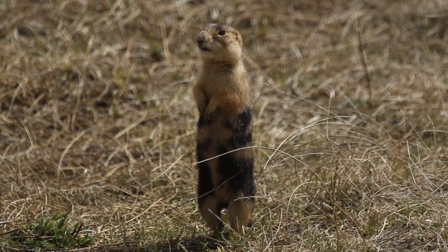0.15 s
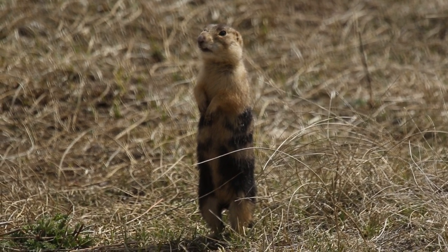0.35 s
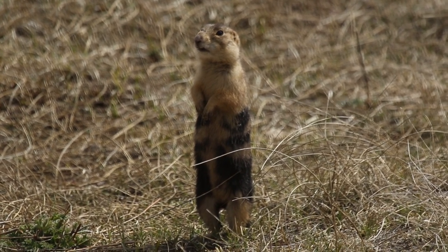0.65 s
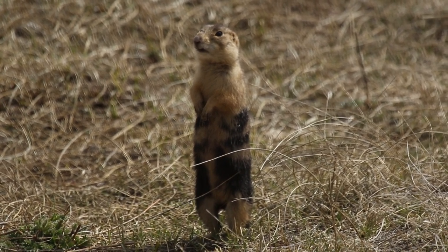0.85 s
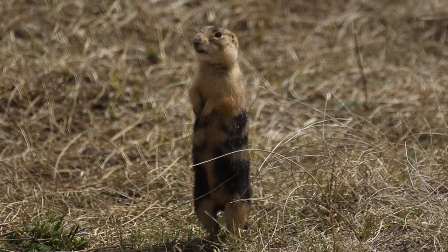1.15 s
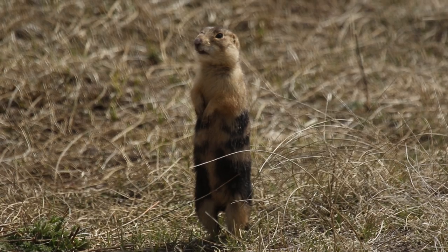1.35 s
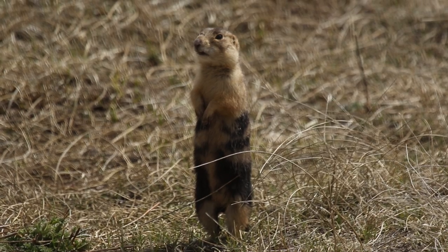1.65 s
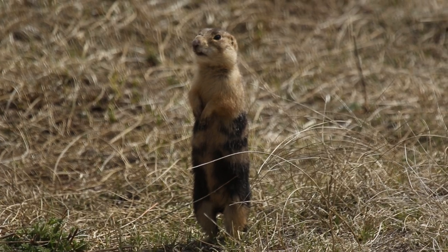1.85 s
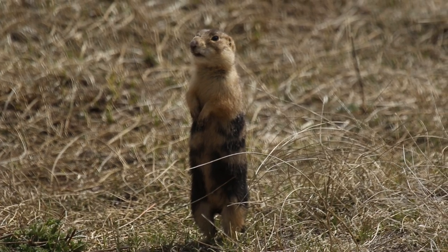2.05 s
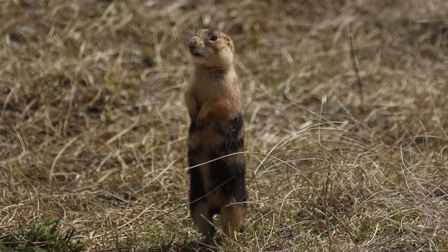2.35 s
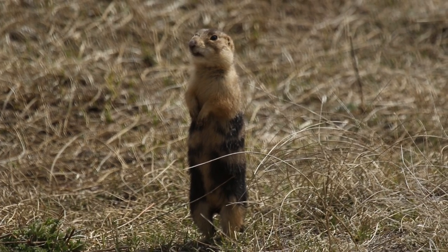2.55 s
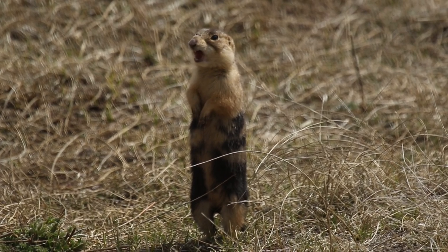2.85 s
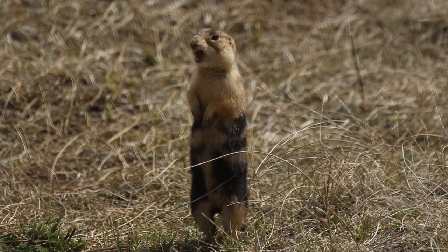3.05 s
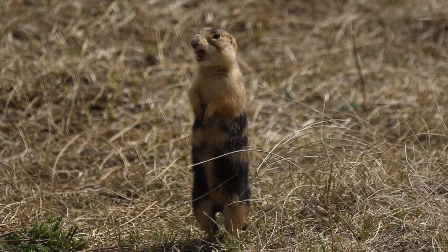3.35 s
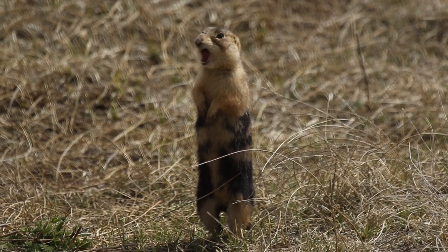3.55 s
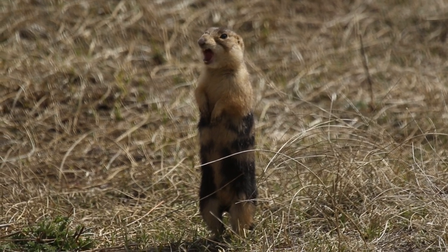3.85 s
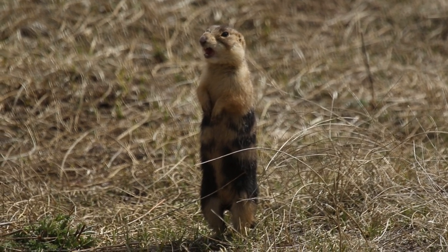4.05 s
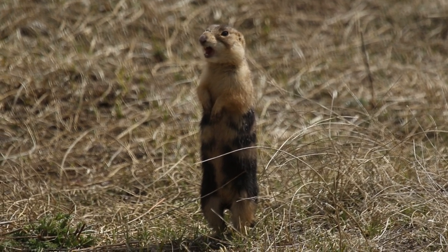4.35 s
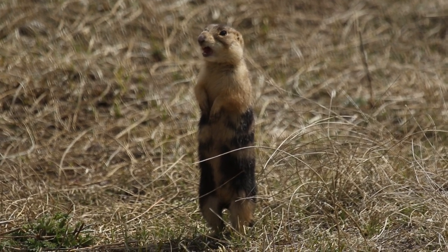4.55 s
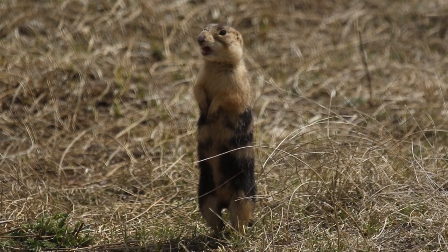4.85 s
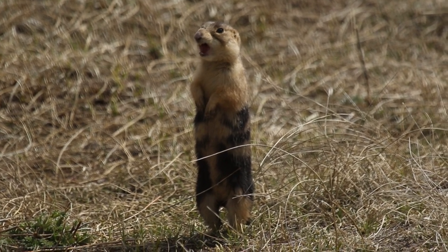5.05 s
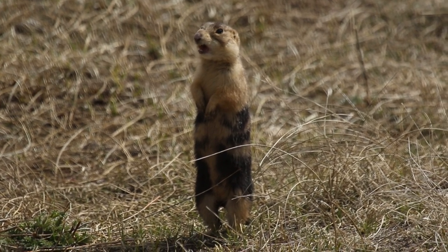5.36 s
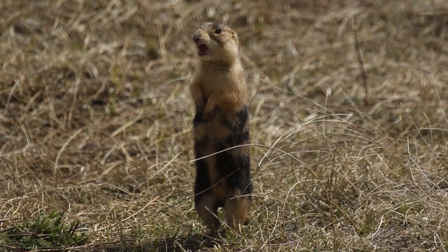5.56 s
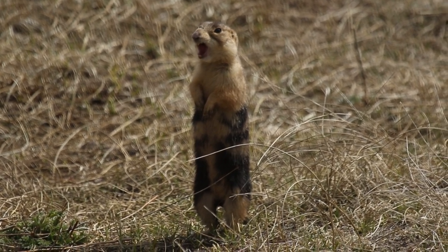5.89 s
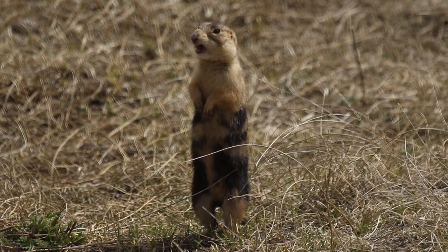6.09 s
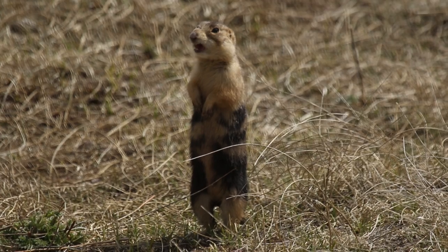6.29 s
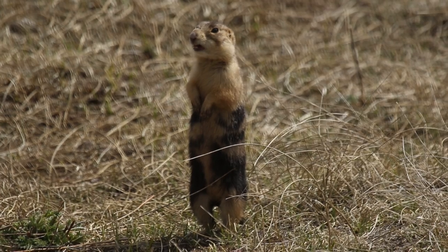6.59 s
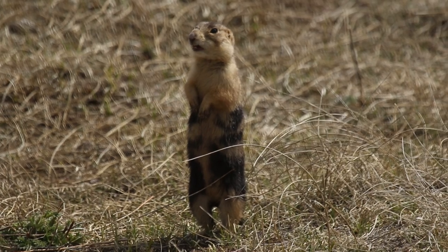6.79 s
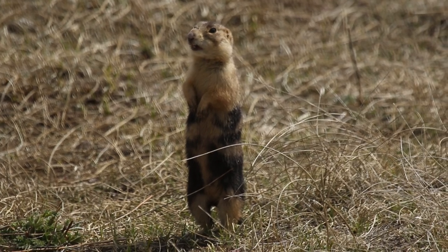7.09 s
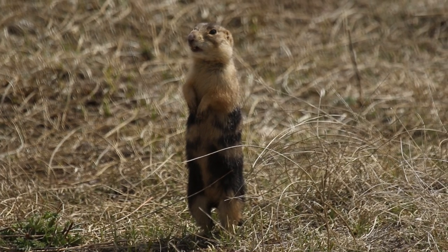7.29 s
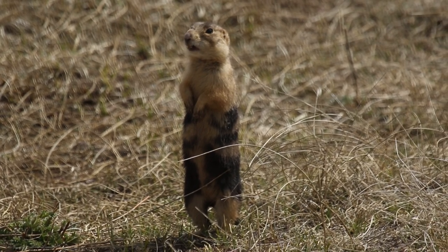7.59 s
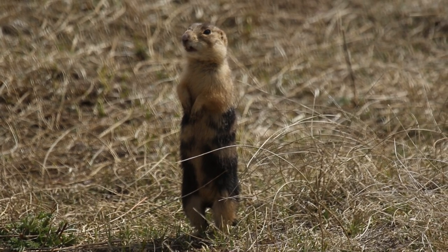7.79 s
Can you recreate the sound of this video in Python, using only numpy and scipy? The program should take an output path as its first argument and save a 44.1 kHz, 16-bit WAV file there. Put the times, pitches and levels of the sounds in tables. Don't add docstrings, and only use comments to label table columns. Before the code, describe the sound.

Heavy wind buffets an unprotected microphone; a small rodent huffs softly, then barks sharply at an even pace, with faint bird whistles afterwards.

```python
import sys
import numpy as np
from scipy import signal
from scipy.fft import rfft, irfft
from scipy.io import wavfile
from scipy.ndimage import uniform_filter1d

SR = 44100
rng = np.random.default_rng(int(sys.argv[2]) if len(sys.argv) > 2 else 0)


def volts(x):
    e = np.asarray(x, float) / 20
    return 10 ** e


def wrap_up_sound(samples):
    columns = np.atleast_2d(samples).T
    tamed = np.clip(columns, -1, 1)
    steps = np.round(tamed * 32767).astype(np.int16)
    wavfile.write(sys.argv[1], SR, steps)


N = 349747
T = np.arange(N) / SR

# (frequency [Hz], density [dB per Hz])
AIR_COLOUR = [(120, -38.5), (200, -1.5), (249, -18), (322, 1.5), (590, -8.5), (659, -4.5), (851, -12),
              (916, -12.5), (1710, -16), (2470, -14), (3070, -18.5), (5230, -23), (11100, -23.5),
              (15100, -29.5), (16000, -33)]
AIR_DB = -56

# (time [s], rumble level [dB])
STEADY_WIND = [(0, -29.5), (.19, -32), (.27, -47.5), (.52, -43.5), (.68, -28), (1.18, -25.5), (1.35, -41.5),
               (1.64, -46.5), (1.72, -33.5), (2.3, -29), (3.0, -35), (4.1, -26), (5.4, -25.5),
               (6.35, -31.5), (6.74, -39.5), (6.93, -64), (7.1, -36.5), (7.93, -36)]
# (time [s], drop [dB], length [s])
LULLS = [(0.633, 20, 0.033), (0.758, 6.5, .04), (1.234, 10, 0.027), (2.005, 15, 0.034),
         (2.308, 11.5, 0.055), (2.65, 16, 0.013), (2.866, 15, 0.071), (3.067, 18, 0.038), (3.35, 11, 0.075),
         (3.53, -1, 0.067), (3.874, 9.5, 0.063), (4.004, 5, 0.037), (4.857, 8, 0.05), (5.11, 4, 0.046),
         (5.5, 7.5, 0.039), (5.665, 9, 0.078), (5.987, 6, 0.052), (6.216, 4.5, 0.032), (6.46, 20, 0.098),
         (6.641, 19, 0.058), (7.362, 15.5, 0.047), (7.695, 14.5, 0.044)]
# (peak time [s], rumble level [dB], length [s], buffet re rumble [dB])
GUSTS = [(0.149, -21, 0.028, 0), (0.572, -26, 0.037, -2), (0.857, -19.5, 0.026, 4), (1.041, -27, 0.042, 2),
         (1.446, -25, 0.054, 0), (1.759, -18, 0.06, 2), (1.899, -29, 0.029, 1.5),
         (2.097, -23.5, 0.15, -8.5), (2.373, -18.5, 0.044, -1.4), (2.774, -22.5, 0.062, -8),
         (2.938, -26, 0.023, -16), (3.106, -25, 0.023, -7.5), (3.462, -20.5, 0.02, -3),
         (3.652, -27.5, 0.083, 1), (3.926, -30, 0.021, 3.5), (4.217, -23, 0.076, 2.5),
         (4.42, -17.5, 0.035, 10), (4.791, -21.5, 0.049, 2.5), (4.912, -25, 0.043, 8.5),
         (5.031, -16.5, 0.048, -1), (5.161, -30, 0.061, 10), (5.348, -16.5, 0.049, 1.3),
         (5.635, -20, 0.028, -10.5), (5.849, -15, 0.058, 0.6), (6.047, -25, 0.04, -14),
         (6.394, -19, 0.025, -19.5), (6.565, -23.5, 0.074, -3), (7.057, -29, 0.042, -8.1),
         (7.57, -37, 0.12, -2.5), (7.872, -26.1, 0.059, -4)]
SURGE_DB, SURGE_HZ = 2.5, 4.6
BUFFET_DB, BUFFET_GROWS = -6.5, 0.32
FLUTTER_DB, FLUTTER_GROWS = -12.5, 1.33
SWAY_DB, SWAY_FOLLOWS = -51.5, 0.6

# (time [s], peak level [dB], pitch [Hz])
THUMPS = [(0.147, -16, 98), (0.172, -16, 128), (0.567, -18, 92), (0.84, -13, 98), (1.019, -12.5, 96),
          (1.057, -14.5, 150), (1.141, -16.5, 112), (1.731, -20, 145), (1.758, -14.5, 112),
          (1.809, -8, 164), (1.895, -14, 129), (2.062, -14, 89), (2.105, -17, 139), (2.199, -12.5, 172),
          (3.409, -19, 89), (3.649, -18.5, 142), (3.922, -22, 132), (4.039, -17, 114), (4.169, -13.5, 148),
          (4.217, -12.5, 110), (4.466, -6.5, 183), (4.795, -15.5, 95.5), (4.885, -8, 210),
          (5.029, -9, 106.5), (5.143, -12.5, 137), (5.256, -18.5, 115), (5.82, -19, 90.5),
          (5.848, -13, 128), (5.902, -19, 102), (6.591, -21.5, 204)]
# (time [s], peak level [dB])
FLICKS = [(0.694, -30.5), (0.836, -27), (1.004, -34), (1.021, -15), (1.055, -15.5), (1.145, -27.5),
          (1.73, -19), (1.754, -27), (1.784, -24), (1.896, -23), (2.2, -21), (3.602, -27), (4.041, -25),
          (4.07, -25.5), (4.219, -26.5), (4.252, -23.5), (4.354, -17.5), (4.434, -18), (4.467, -18.5),
          (4.514, -19), (4.8, -21), (4.89, -16.5), (4.961, -27), (5.145, -14.5), (5.184, -20),
          (5.259, -23.5), (5.331, -20.5), (5.786, -20.5), (5.902, -25), (7.461, -28.5)]
# (time [s], peak level [dB], pitch [Hz])
SLAM = [(4.4100, 4, 190)]
STRAY_FLICKS, STRAY_DB = 70, -11

# (time [s], peak level [dB], pitch [Hz])
STEM_TICK = (7.536, -30.5, 1050)

# (start time [s], length [s], from [Hz], to [Hz], peak level [dB])
BIRDS = [
    (5.35, .035, 4700, 4550, -66),
    (6.24, .045, 4600, 4400, -68),
    (6.37, .014, 6000, 5480, -54),
    (6.384, .022, 5460, 5850, -66),
    (6.667, .28, 3550, 2500, -62),
    (7.034, .09, 3550, 2900, -64),
    (7.157, .1, 2920, 2150, -69),
    (7.4, .05, 4300, 4000, -72),
    (7.543, .17, 3600, 2610, -67),
]
GLIDE_BEND, BIRD_FADE_DB = 1.8, 13

# (start time [s], end time [s], level [dB])
INTAKES = [(2.99, 3.18, -63.5), (3.32, 3.558, -61), (3.72, 3.923, -64.5), (4.085, 4.29, -73),
           (4.5, 4.69, -81)]
# (peak time [s], peak level [dB], swell [s], fade [s], voiced share [0-1])
HUFFS = [(2.117, -41, 0.013, 0.055, 0.6), (2.24, -39.5, 0.023, 0.026, 0.2),
         (2.362, -38.5, 0.023, 0.023, 0.33), (2.43, -42, 0.017, 0.023, 0.36),
         (2.555, -41, 0.022, 0.025, 0.16), (2.612, -43.5, 0.014, 0.023, 0.06), (2.747, -47, .024, 0.062, 0),
         (2.925, -50, .015, .03, .1), (2.975, -49, .02, 0.035, 0.1), (3.114, -47, 0.022, 0.053, 0),
         (3.166, -51, 0.015, 0.054, 0.4), (5.37, -61, .02, 0.027, .5)]
# (frequency [Hz], width [Hz], level [dB])
SHUT_MOUTH = [(1830, 710, 0.5), (2305, 640, 4), (3840, 940, 1.5), (7670, 1350, 0), (10860, 2100, -3.5),
              (13260, 770, -10)]

# (start time [s], rise to top pitch [s], fall from top to end [s], top pitch [Hz], level [dB])
BARKS = [(2.796, 0.047, 0.051, 1090, -17), (3.184, 0.043, 0.05, 1095, -16.5),
         (3.559, 0.047, 0.043, 1098, -16.5), (3.924, 0.035, 0.055, 1073, -17),
         (4.297, 0.041, 0.046, 1068, -18.5), (4.697, 0.043, 0.043, 1046, -19),
         (5.132, .044, 0.041, 1003, -21), (5.525, 0.044, 0.038, 1045, -18),
         (5.923, 0.047, 0.038, 1045, -18)]
# (phase [-1 start, 0 top pitch, 1 voice ends], effort [dB], hoarseness [0-1])
BARK_ARCH = [
    (-1, -15, .1),
    (-.82, -1, .4),
    (-.55, 1, .36),
    (-.36, -.3, .07),
    (.65, -.2, .09),
    (.92, -2, .28),
    (1.1, -6.5, .75),
    (1.3, -14, .98),
    (2, -46, 1),
]
PITCH_CLIMB = [(-1, .54), (-.9, .6), (-.72, .73), (-.54, .87), (-.36, .96), (-.18, .993), (0, 1)]
SAG, SAG_POWER = 0.42, 2.2
FADE_DB, TIRE_DB_PER_S = 4, 0.58
# (frequency [Hz], width [Hz], level [dB])
OPEN_MOUTH = [(950, 2800, -17.5), (2516, 247, 7), (3230, 1020, 3), (3940, 1150, 4), (5160, 695, 5.5),
              (5850, 800, 3), (7200, 630, 1.5), (9580, 720, -7), (10460, 890, -13), (13000, 1000, -26),
              (15200, 900, -34.5)]


def rms_one(x):
    return x / np.sqrt(np.mean(x ** 2) + 1e-20)


def band(x, low_hz, high_hz, order=2):
    return signal.sosfilt(signal.butter(order, [low_hz, high_hz], "band", fs=SR, output="sos"), x)


def drift(rate_hz):
    r = np.exp(-2 * np.pi * rate_hz / SR)
    wander = signal.lfilter([1], [1, -2 * r, r * r], rng.standard_normal(N + SR))
    return rms_one(wander[SR:])


def tract(x, resonances):
    out = 0
    for k, (hz, width_hz, level_db) in enumerate(resonances):
        r = np.exp(-np.pi * width_hz / SR)
        pole = [1, -2 * r * np.cos(2 * np.pi * hz / SR), r * r]
        ringing = signal.lfilter([(1 - r * r) / 2, 0, (r * r - 1) / 2], pole, x + 1e-18)
        out = out + (-1) ** k * volts(level_db) * ringing
    return out


def air():
    hz, level_db = np.transpose(AIR_COLOUR)
    bins_hz = np.arange(N // 2 + 1) * SR / N + 1
    colour = volts(np.interp(np.log(bins_hz), np.log(hz), level_db))
    return volts(AIR_DB) * rms_one(irfft(rfft(rng.standard_normal(N)) * colour, N))


def sway():
    level_db = SWAY_DB + SWAY_FOLLOWS * (np.interp(T, *np.transpose(STEADY_WIND)) + 35)
    return volts(level_db) * rms_one(band(rng.standard_normal(N), 21.3, 41.9))


def bump(peak, length):
    return np.exp(-(1.84 * (T - peak) / length) ** 2)


def steady_wind_db():
    lulls_db = sum(drop_db * bump(s, 1.28 * length) for s, drop_db, length in LULLS)
    return np.interp(T, *np.transpose(STEADY_WIND)) - lulls_db


def layers(rumble_db, buffet_db):
    flutter_db = FLUTTER_DB + FLUTTER_GROWS * buffet_db
    return volts([rumble_db, rumble_db + buffet_db, rumble_db + flutter_db])


def wind():
    steady_db = steady_wind_db() + SURGE_DB * drift(SURGE_HZ)
    gains = layers(steady_db, BUFFET_DB + BUFFET_GROWS * (steady_db + 30.5))
    for peak, rumble_db, length, buffet_db in GUSTS:
        gains = gains + layers(rumble_db - 3.5, buffet_db)[:, None] * bump(peak, length)
    bands = ((49.8, 131.5, 4.1), (97.4, 233.8, 8.1), (240.4, 430, 11.5))
    lumps = drift(24.3)
    out = 0
    for gain, (low_hz, high_hz, lump_db) in zip(gains, bands):
        lump_gain = volts(lump_db * (lumps + 0.6 * drift(40)))
        lumpy = band(rng.standard_normal(N) * lump_gain, low_hz, high_hz, order=3)
        out = out + gain * lumpy / np.sqrt(uniform_filter1d(lumpy ** 2, size=4000))
    return out


def eddies(rows, gain_db, cycles, lean):
    out = np.zeros(N + SR)
    after = T[:SR // 20]
    for start, peak_db, pitch_hz in rows:
        turn = after * pitch_hz - 2 * cycles
        swing = np.cos(2 * np.pi * turn + lean) * np.exp(-np.abs(turn / cycles) ** 1.73)
        i = int(start * SR)
        out[i:i + len(after)] -= volts(peak_db + gain_db) * swing
    return out[:N]


def thumps():
    slow = [(s, level_db, 1.16 * hz) for s, level_db, hz in THUMPS]
    when, size = rng.random((STRAY_FLICKS, 2)).T
    when = when * N / SR
    stray_db = np.interp(when, T, steady_wind_db()) + STRAY_DB + 9 * size
    flicks = [*FLICKS, *np.transpose([when, stray_db])]
    quick = [(s, level_db, 380 * volts(rng.normal(0, 1.0))) for s, level_db in flicks]
    out = eddies(slow, 4.65, cycles=0.438, lean=0.8)
    out = out + eddies(quick, 4.55, cycles=0.37, lean=2.43)
    return out + eddies(SLAM, 0, cycles=0.6, lean=0.3)


def tick():
    start, peak_db, pitch_hz = STEM_TICK
    clicks = np.zeros(N)
    clicks[int(start * SR):][:500] = rng.standard_normal(500) * volts(peak_db) * np.hanning(500)
    return tract(clicks, [(pitch_hz, 300, 0), (1750, 300, -7), (2800, 1200, -9), (600, 300, -6)])


def birds():
    out = np.zeros(N)
    for start, length, from_hz, to_hz, peak_db in BIRDS:
        at = np.clip((T - start) / length, 0, 1)
        pitch_hz = to_hz + (from_hz - to_hz) * (1 - at) ** GLIDE_BEND
        edges = np.clip(np.minimum(at, 1 - at) * length / 0.0071, 0, 1)
        level_db = peak_db + 0.5 - BIRD_FADE_DB * np.abs(at - 0.25) ** 1.2
        out += edges * volts(level_db) * np.sin(2 * np.pi * np.cumsum(pitch_hz) / SR)
    return out


def grassland(x):
    after = T[:SR // 3]
    scatter = rng.standard_normal(len(after)) * volts(-60 * after / 0.12) * np.minimum(after / 0.008, 1)
    far = band(rng.standard_normal(len(after)), 2350, 3050) * volts(-60 * after / 0.28)
    response = volts(-34) * scatter + volts(-48) * far
    response[0] = 1
    return signal.fftconvolve(x, response)[:N]


def intakes():
    swell = 0
    for start, end, level_db in INTAKES:
        at = np.clip((T - start) / (end - start), 0, 1)
        swell = swell + volts(level_db) * np.sin(np.pi * at) ** 0.6
    teeth = [(2500, 490, -5.5), (4900, 500, -3.5), (7040, 630, -3.5), (9500, 700, -8)]
    return swell * rms_one(tract(rng.standard_normal(N), teeth))


def pulses(pitch_hz, hoarse, dull_db, jaw_hz, jaw_db):
    cycle = 2 * np.pi * np.cumsum(pitch_hz) / SR
    clean = 0
    for k in range(1, 32):
        hz = k * pitch_hz
        shimmer_db = 3.05 * np.interp(np.linspace(0, 11, len(hz)), np.arange(12), rng.standard_normal(12))
        jaw = jaw_db * np.exp(-((hz - jaw_hz) / 600) ** 2)
        weak = dull_db * np.log2(np.maximum(hz / 7000, 1))
        clean = clean + volts(shimmer_db + jaw - weak) * np.cos(k * cycle) * (hz < 17000)
    clean = clean * np.sqrt(pitch_hz / 1000)
    noise = 6.0 * rng.standard_normal(len(cycle)) * (0.6 + 0.4 * np.cos(cycle))
    noise = signal.lfilter([0.62], [1, -0.45], noise)
    hoarse = np.clip(hoarse, 0, 1)
    return -np.sqrt(1 - hoarse ** 2) * clean + hoarse * noise


def huffs():
    folds = np.zeros(N)
    since = T[:SR // 5] - 0.05
    for peak, peak_db, swell, fade, voiced in HUFFS:
        shape_db = -20 * np.where(since < 0, (since / swell) ** 2, np.abs(since / fade) ** 1.9)
        pitch_hz = 790 + 60 * np.tanh(since / 0.02094)
        hoarse = np.sqrt(1 - np.clip(voiced, 0, 1))
        i = int(peak * SR) - SR // 20
        folds[i:i + len(since)] += volts(peak_db - 3.0 + shape_db) * pulses(pitch_hz, hoarse, 0, 1, 0)
    return tract(tract(folds, SHUT_MOUTH), SHUT_MOUTH)


def barks():
    folds, wobble = np.zeros(N), drift(130)
    phase, effort_db, hoarse = np.transpose(BARK_ARCH)
    for start, rise, fall, top_hz, early_db in BARKS:
        i, j = int(start * SR), int((start + rise + 2 * fall) * SR)
        after = T[i:j] - start - rise
        at = np.where(after < 0, after / rise, after / fall)
        rough = np.interp(at, phase, hoarse)
        climb = np.interp(at, *np.transpose(PITCH_CLIMB))
        climb = uniform_filter1d(climb, size=200, mode="nearest")
        sag = SAG * np.clip(at, 0, 1.08) ** SAG_POWER
        pitch_hz = top_hz * (climb - sag) * (1 + 0.0677 * rough * wobble[i:j])
        late_db = early_db - FADE_DB - TIRE_DB_PER_S * (start - BARKS[0][0])
        level_db = np.interp(at, phase, effort_db) + np.interp(at, [-0.3, 0.4], [early_db, late_db])
        dull_db = 0.9 * np.clip(-20 - level_db, 0, 14)
        jaw_hz = np.interp(at, [-1, -0.3], [2500, 4300])
        jaw_db = np.interp(at, [-0.4, 0.1], [3, 0])
        folds[i:j] += volts(level_db - 7) * pulses(pitch_hz, rough, dull_db, jaw_hz, jaw_db)
        puff = np.linspace(0, 1, 700) * rng.standard_normal(700)
        folds[i - 700:i] += volts(early_db - 22.5) * puff
    return tract(folds, OPEN_MOUTH)


def scene():
    at_the_microphone = air() + sway() + wind() + thumps() + tick()
    across_the_grass = grassland(birds() + intakes() + huffs() + barks())
    return (at_the_microphone + across_the_grass)[None]


def low_pass(x):
    return signal.sosfilt(signal.butter(12, 15900, fs=SR, output="sos"), x)


def record(dry):
    over_db = np.maximum(20 * np.log10(np.abs(dry) + 1e-9) + 4, 0)
    slope = 28 * T
    duck_db = np.maximum.accumulate(np.minimum(over_db, 5) + slope, axis=1) - slope
    duck_db = signal.lfilter([0.004], [1, -0.996], duck_db)
    mix = np.clip(dry * volts(-duck_db), -1, 1)
    return low_pass(mix)


dry = scene()
out = record(dry)
wrap_up_sound(out)
```